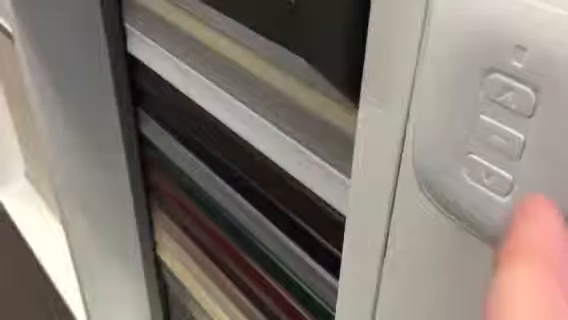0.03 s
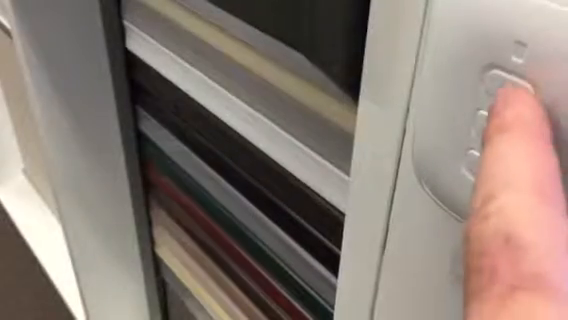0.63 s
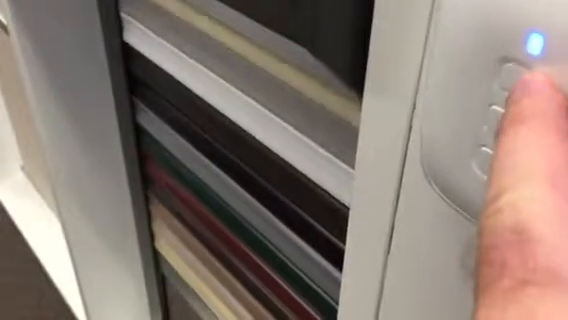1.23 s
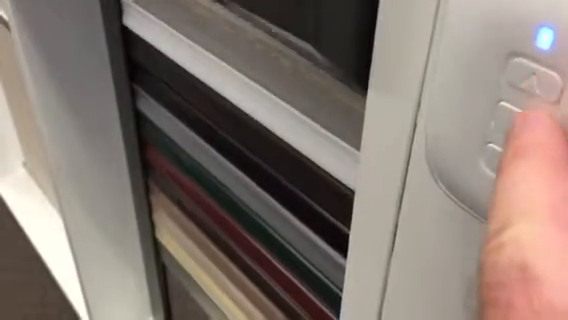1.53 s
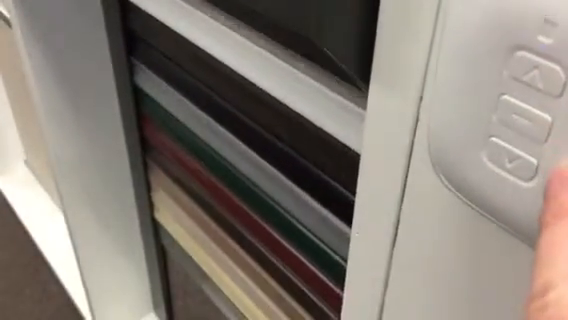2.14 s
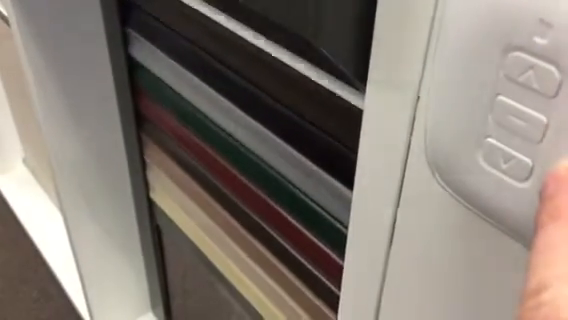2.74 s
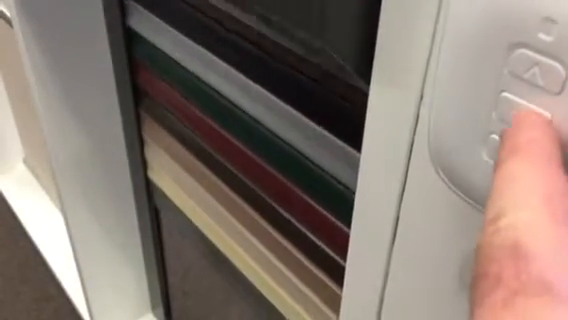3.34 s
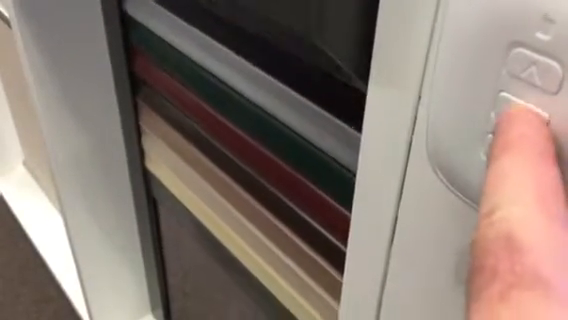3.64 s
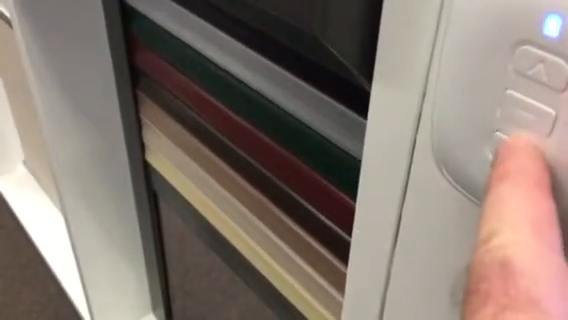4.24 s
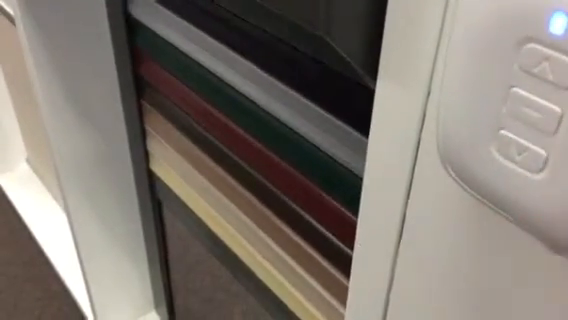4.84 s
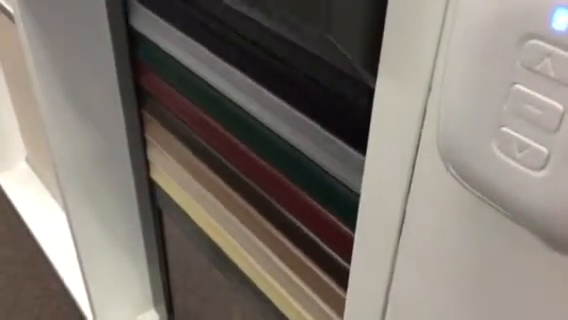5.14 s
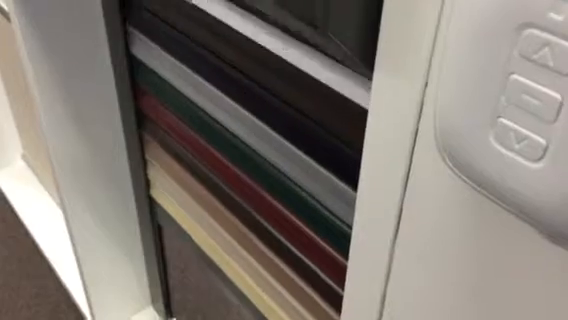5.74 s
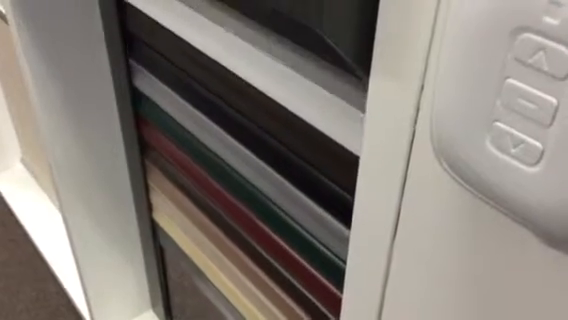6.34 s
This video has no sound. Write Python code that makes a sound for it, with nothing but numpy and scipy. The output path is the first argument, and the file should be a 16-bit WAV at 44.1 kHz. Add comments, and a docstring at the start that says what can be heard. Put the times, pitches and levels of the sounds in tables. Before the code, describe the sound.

A quiet low rumble fills a small room, with the microphone close to a wall switch. Around 0.3 seconds a sleeve brushes faintly with a soft bump of the hand. A button ticks at about 1.2 seconds, then a relay clicks and a roller shutter's motor starts at 1.3. Its whine rises quickly and settles into a steady whir, gears rattling in the housing while the slats hiss softly, scraping lightly near 1.5 and 3.5 seconds. Another button tick comes at 3.8 seconds. At 4 seconds the relay snaps and the motor stops with a tiny squeal and a sharp clunk, the loudest sound, which rings briefly. After a short lull, a button ticks at 4.5 seconds and the motor restarts with a click and a jolt at 4.7. It whines and rattles steadily until the end, at around 6.7 seconds.

```python
"""Roller shutter, up and down

Indoors in a small room, one microphone close to the wall switch. A tubular motor runs, stops and runs
again, its gears whining and rattling in the housing while the slats scrape in their guides. Each button
tick is followed by a relay click and the clunk of the motor's brake. A sleeve brushes as the hand
reaches out, and the room rumbles quietly behind it all."""
import sys
import numpy as np
from scipy import signal
from scipy.fft import rfft, irfft, next_fast_len
from scipy.io import wavfile
from scipy.ndimage import map_coordinates

SR = 44100
rng = np.random.default_rng(int(sys.argv[2]) if len(sys.argv) > 2 else 0)


def int16_out(signal):
    """Quantize to a 16-bit WAV file."""
    q = np.round(np.clip(np.atleast_2d(signal).T, -1, 1) * 32767)
    wavfile.write(sys.argv[1], SR, q.astype(np.int16))


N = 290619
TIME = np.arange(N) / SR

# run 0 goes up, run 1 down: (power on [s], power off [s])
MOTOR_RUNS = [(1.297, 4.012), (4.696, 6.8)]
# per run: (settled speed [turns/s], shortfall at the start [turns/s], settling [s], creep [turns/s^2])
SHAFT_SPEEDS = [(44.45, 5.5, .125, .34), (45.05, 10.5, .065, .28)]
def motor(run, rise_s=0.0059, coast_s=0.022):
    """One run: the shaft starts slow, settles and creeps faster; the sound dies as the power is cut."""
    on, off = MOTOR_RUNS[run]
    settled, shortfall, settling_s, creep = SHAFT_SPEEDS[run]
    age = np.maximum(TIME - on, 0)
    speed = settled - shortfall * np.exp(-age / settling_s) + creep * age
    turns = np.cumsum(speed + 0.0502 * wobble(7)) / SR
    powered = (1 - np.exp(-age / rise_s)) * np.exp(-np.maximum(TIME - off, 0) / coast_s)
    return powered * (rattle(turns, run) + slats(run) + wall(run) + gears(turns, age, run) + mains())


def height():
    """The shutter winds up from 0 to 1, then down at the same pace."""
    up, down = [np.clip(TIME, on, off) - on for on, off in MOTOR_RUNS]
    return (up - down) / up[-1]


# two strong whines: (order [per turn], level up [dB], growth up [dB/s], level down [dB], growth [dB/s])
LOW_WHINES = [(20.03, -43.5, 2.5, -49, 1), (24, -49.5, 3, -54, -1)]
# the third and highest: (order up [per turn], order down [per turn])
TOP_WHINE_ORDER = [29.76, 30]
# its contour, one list per run: (time [s], level [dB])
TOP_WHINE_LEVELS = [
    [(1.33, -48), (1.42, -35.5), (1.72, -42.5), (1.95, -54), (2.6, -50), (3.55, -47.5), (3.76, -36),
     (4.0, -41)],
    [(4.75, -46), (4.87, -34.3), (5.25, -35.5), (6.2, -45.0), (6.55, -42)],
]
# weaker shaft tones: (order [per turn], level up [dB], level down [dB])
WEAK_WHINES = [(4, -50.5, -51.7), (9.985, -57, -58.5), (12.09, -68.5, -59.5), (19.63, -62.5, -52),
               (20.5, -76.5, -48.5), (26.9, -58.5, -58), (29.5, -61, -57), (38, -61, -69),
               (42.85, -63, -57), (46.2, -52.5, -65), (50, -56, -66), (50, -64, -60), (53.8, -57, -54)]
def gears(turns, age, run, build_s=0.22):
    """Whines locked to the shaft; the weak ones build up as the gears take the load."""
    mesh = np.array(LOW_WHINES)[:, [0, 1 + 2 * run, 2 + 2 * run]]
    low = sum(amp(db + growth * age) * whine(turns, order, flutter_db=2, slack_rad=.23)
              for order, db, growth in mesh)
    top_db = np.interp(TIME, *np.transpose(TOP_WHINE_LEVELS[run]))
    top = amp(top_db) * whine(turns, TOP_WHINE_ORDER[run], flutter_db=1.5, slack_rad=.17)
    weak = sum(amp(db[run]) * whine(turns, order, flutter_db=2.5, slack_rad=.22)
               for order, *db in WEAK_WHINES)
    return low + top + (1 - np.exp(-age / build_s)) * weak


def whine(turns, order, flutter_db, slack_rad):
    """One gear tone; backlash makes its level and phase waver."""
    flutter = unit(amp(flutter_db * wobble(22)))
    return np.sqrt(2) * flutter * np.sin(2 * np.pi * order * turns + slack_rad * wobble(14))


# housing resonances: (frequency [Hz], width [Hz], relative level up [dB], relative level down [dB])
HOUSING_MODES = [(197, 70, -15, -13), (235, 25, -16, -10), (253, 52, -12.5, -18), (351.7, 26, -11, -12),
                 (390, 90, -13.5, -16), (442, 25, -13, -17.5), (537, 36, -10.5, -10.5),
                 (607, 134, -14.5, -15.5), (745, 104, -9.5, -7), (816, 160, -9, -6.5), (917, 65, -7.5, -5),
                 (961, 60, -7.5, -7.5), (1081, 136, -7.5, -9.5), (1159, 36, -5.5, -4.5),
                 (1258, 61, -2, -0.5), (1326, 74, -6, -1.5), (1405, 140, -12, -10), (1512, 150, -9, -6.5),
                 (1649, 157, -8, -7.5), (1860, 180, -12, -16.5), (2018, 59, -12.5, -11),
                 (2123, 124, -11.5, -11), (2310, 200, -18, -14.5), (2432, 98, -12, -11.5),
                 (2610, 250, -10.5, -14), (2844, 61, -11.5, -12), (3090, 280, -16.5, -13.5),
                 (3380, 170, -13.5, -10), (3690, 690, -17, -15), (3679, 69, -9.5, -6.5),
                 (4690, 720, -23.5, -21.5)]
# the housing's five frequency zones: (edge [Hz])
ZONE_EDGES = [0, 1110, 1450, 1800, 3000, 6000]
# each zone swells or dips at one shutter height:
# (level up [dB], level down [dB], swell [dB], height [0-1], width [share of full height])
ZONE_LEVELS = [(-41.5, -40.5, 1, 0.25, 0.48), (-39, -39.5, -3, 0.26, 0.34), (-48, -44.5, 6.5, .3, 0.38),
               (-44, -44, 4, 0.29, 0.31), (-48.5, -47.5, 4, 0.65, 0.46)]
def rattle(turns, run, knocks_per_s=5000, spread_db=2.5, throb=0.14):
    """Loose teeth knock at random, hardest four times a turn, and ring the housing."""
    knocks = (rng.random(N) < knocks_per_s / SR) * rng.choice([-1, 1], N)
    knocks = knocks * amp(spread_db * rng.standard_normal(N))
    knocks *= 1 + throb * np.cos(2 * np.pi * 4 * turns)
    modes = np.array(HOUSING_MODES)[:, [0, 1, 2 + run]]
    out = np.zeros(N)
    for low, high, (*base_db, swell_db, centre, width) in zip(ZONE_EDGES, ZONE_EDGES[1:], ZONE_LEVELS):
        zone = modes[(modes[:, 0] >= low) & (modes[:, 0] < high)]
        db = base_db[run] + swell_db * np.exp(-((height() - centre) / width) ** 2) + .5 * wobble(6)
        delayed = np.roll(knocks, low)  # each zone answers with its own delay
        out += amp(db) * unit(filtered(delayed, lambda hz: resonances(zone, hz)))
    return out


def resonances(modes, hz):
    """The gain of a housing zone: its peaks add in power."""
    return np.sqrt(sum((amp(db) / (1 + (2 * (hz - centre) / width) ** 2)) ** 2
                       for centre, width, db in modes))


# hum of the windings: (frequency [Hz], level [dB])
MAINS_TONES = [(50, -68.5), (200, -62), (350, -68.5), (500, -68.5)]
def mains():
    """The windings hum steadily with the mains."""
    return sum(np.sqrt(2) * amp(db) * np.sin(2 * np.pi * hz * TIME) for hz, db in MAINS_TONES)


# the brake lifts at each start: (time [s], level [dB], t60 [s])
BRAKE_LIFTS = [(1.3235, -17, 0.02), (1.3286, -17, 0.033), (4.7252, -13.5, 0.034)]
# it snaps shut and rebounds: (time [s], level [dB], t60 [s], chatter over push [ratio])
BRAKE_CLUNKS = [(4.0691, -4, 0.015, 0.75), (4.0734, -18.5, 0.05, 2.8), (4.0833, -24.5, 0.075, 0.84)]
# their colours: (frequency [Hz], relative level [dB])
LIFT_COLOUR = [(200, -31), (450, -26), (700, -25), (920, 0), (1150, -11), (1800, -11), (2120, 0),
               (2650, -9.5), (3050, -29), (3650, -14), (5200, -28), (8500, -26.5), (11000, -38),
               (16000, -41)]
CLUNK_COLOUR = [(200, -44.5), (480, -26.5), (780, -27.5), (940, -14.5), (1120, -5.5), (1290, -3),
                (1550, -9.5), (1800, -22), (2050, -8.5), (2550, -15.5), (3000, -25.5), (5000, -36),
                (6300, -27), (7200, -33), (16000, -53)]
# the tube, its frame and the wall's low note ring on: (frequency [Hz], level [dB], t60 [s])
AFTER_RING = [(64.3, -55.5, 1.5), (180, -50.5, .7), (348, -54.5, 0.77), (536, -50.5, 0.48),
              (957, -28.5, 0.17), (1000, -52.5, 0.6), (1114, -56.5, 2.1), (1217, -56, 1.1),
              (1310, -37, .14), (1250, -35, .12)]
def brake():
    """The brake lifts at each start and shuts after the motor's squeal; tube, frame and wall ring on."""
    lift = blows(BRAKE_LIFTS, LIFT_COLOUR, scatter=1, contact_s=.00004)
    shut = sum(blows([blow], CLUNK_COLOUR, scatter, contact_s=.00006) for *blow, scatter in BRAKE_CLUNKS)
    shut_at = BRAKE_CLUNKS[0][0]
    age = np.maximum(TIME - shut_at, 0)
    ring = sum(amp(db - 60 * age / t60) * np.sin(2 * np.pi * hz * age + 0.39 * wobble(40) * (age > 0))
               for hz, db, t60 in AFTER_RING)
    return lift + squeal(shut_at) + shut + ring


def squeal(shut_at, start_s=4.005, hz=2430, rise_s=.011, hold_s=.01, release_s=.005):
    """The slowing motor squeals briefly, then only faintly until the brake shuts."""
    age = TIME - start_s
    burst = amp(-36) * np.exp(-np.maximum(age - rise_s - hold_s, 0) / release_s)
    lingering = amp(-53.5) * (TIME < shut_at)
    level = np.clip(age / rise_s, 0, 1) * (burst + lingering)
    return level * np.sqrt(2) * np.sin(2 * np.pi * hz * TIME + .5 * wobble(200))


# button, relay (in, out, in) and motor jolt: (time [s], level [dB], t60 [s])
BUTTON_TICKS = [(1.16, -35.5, 0.023), (3.8372, -31, .008), (4.5055, -35, 0.025)]
RELAY_SNAPS = [(1.2921, -17, 0.0095), (4.0011, -19, 0.011), (4.6915, -18, 0.013)]
MOTOR_JOLTS = [(1.2972, -25.5, 0.063), (4.6968, -22, 0.027)]
# their colours: (frequency [Hz], relative level [dB]); the relay has one level column per snap
BUTTON_COLOUR = [(200, 9), (500, -7), (950, 2.5), (1350, 5.5), (1800, -6), (2200, -6), (3000, -16.5),
                 (3900, -4.5), (5500, -24.5), (9000, -28.5), (12500, -12), (16000, -27)]
RELAY_COLOURS = [(200, -17.5, -8, -7), (500, -17.5, -4.5, -4), (1000, 5, -2.5, -2.5), (1990, 3, -5, 0),
                 (2700, -9.5, -0.5, -11), (4120, -1, -4.5, 3.5), (6090, 0.5, -6, 1.5),
                 (7950, -14, -8.5, -7), (9640, -1, 5, 3), (10440, 0, -5, -6), (11500, -1, 1, 3),
                 (13100, -0.5, -12, -11.5), (16000, -3, -24.5, -15)]
JOLT_COLOUR = [(200, -28), (600, -17), (1200, -2), (2000, 2), (2700, -0.5), (3700, 4.5), (5000, -14.5),
               (7000, -18), (12000, -43.5)]
def switch():
    """The button ticks close to the microphone, the relay snaps, the motor jolts as it takes current."""
    ticks = blows(BUTTON_TICKS, BUTTON_COLOUR, scatter=2.5, contact_s=.00003)
    snaps = sum(blows([snap], np.array(RELAY_COLOURS)[:, [0, 1 + k]], scatter=5, contact_s=.00002)
                for k, snap in enumerate(RELAY_SNAPS))
    return ticks + snaps + blows(MOTOR_JOLTS, JOLT_COLOUR, scatter=1.8, contact_s=.00004)


# slats sliding in the guides: (frequency [Hz], relative level up [dB], relative level down [dB])
SLIDE_COLOURS = [(300, -1, -5.5), (4900, 5.5, 7), (5350, -0.5, 1), (6550, 3.5, 2), (6950, -0.5, 0.5),
                 (7370, 1.5, 2), (8150, -7, -1.5), (9150, -3.5, -1.5), (10250, -15, -12.5),
                 (11300, -13.5, -11), (13000, -16.5, -14), (15800, -21.5, -18)]
def slats(run, level_db=(-55.5, -51.5), height_loss_db=2.5, echo_t60=.03, echo_db=-6.5):
    """The sliding slats hiss, less as they leave the guides, coloured by short room reflections."""
    sliding = noise(np.array(SLIDE_COLOURS)[:, [0, 1 + run]]) * amp(0.95 * wobble(60))
    t = np.arange(SR // 20) / SR
    reflections = rng.standard_normal(len(t)) * amp(-60 * t / echo_t60)
    echo = signal.fftconvolve(sliding, reflections / np.linalg.norm(reflections))[:N]
    return amp(level_db[run] - height_loss_db * height()) * unit(sliding + amp(echo_db) * echo)


# slat scrapes: (time [s], level [dB], rise [s])
SCRAPE_STROKES = [(1.312, -51, .012), (1.533, -47, 0.011), (2.81, -62, 0.018), (3.48, -51.5, 0.022),
                  (3.545, -48.5, 0.012), (3.605, -53, 0.012), (4.024, -52, 0.0036)]
# their colour: (frequency [Hz], relative level [dB])
SCRAPE_COLOUR = [(3000, -22), (5400, -5), (6200, 6), (6900, -10.5), (7600, -6), (8500, -17), (9400, -8),
                 (10400, -23.5), (12000, -19), (16000, -33.5)]
def scrapes():
    """The slats scrape in their guides, roughened by tiny catches."""
    return rubbing(SCRAPE_STROKES, SCRAPE_COLOUR, grain_db=2.5)


# the wall under the motor: (frequency [Hz], relative level [dB])
WALL_COLOUR = [(25, -39), (38, -16), (48, -19), (56, -16.5), (64, -0.5), (78, -4.5), (105, 1), (135, -12),
               (200, 5), (400, -27.5), (1000, -71)]
# its strength: (level up [dB], level down [dB])
WALL_LEVELS = [-55.5, -65]
def wall(run):
    """The wall rumbles under the running motor."""
    return amp(WALL_LEVELS[run]) * noise(WALL_COLOUR)


# the sleeve: (time [s], level [dB], rise [s])
SLEEVE_STROKES = [(.313, -58.5, 0.031), (.42, -57, 0.028)]
# the hand arriving: (time [s], level [dB], t60 [s])
HAND_BUMP = [(.315, -51, .05)]
# their colours: (frequency [Hz], relative level [dB])
SLEEVE_COLOUR = [(290, -11), (500, -3), (674, -10), (1140, -6), (1750, -9), (4170, -9), (5090, -14),
                 (7060, -15), (15000, -33.5)]
BUMP_COLOUR = [(400, -27), (660, -8), (730, 3), (800, -19), (1500, -37), (8000, -50)]
def hand():
    """Near the microphone a sleeve brushes and the hand arrives with a soft bump."""
    sleeve = rubbing(SLEEVE_STROKES, SLEEVE_COLOUR, grain_db=0)
    return sleeve + blows(HAND_BUMP, BUMP_COLOUR, scatter=.4, contact_s=.0001)


# the small room's reverberation: (frequency [Hz], t60 [s])
ROOM_DECAY = [(200, 0.95), (1200, 0.26), (4000, 0.1), (14000, 0.11)]
def room(x):
    """Reflections reach the microphone 4 ms late; each frequency dies at its own speed."""
    hz, t, spectrum = signal.stft(rng.standard_normal(SR // 2), SR, nperseg=256)
    decay = amp(-60 * t / along(ROOM_DECAY, hz)[:, None])
    tail = signal.istft(spectrum * decay, SR, nperseg=256)[1]
    return signal.fftconvolve(x, np.pad(tail / np.linalg.norm(tail), (SR // 250, 0)))[:N]


# room tone, murmur and hiss: (frequency [Hz], relative level [dB])
MURMUR_COLOUR = [(20, -44), (33, -23.5), (46, 1), (66, 1), (82, -6.5), (106, 4), (140, -7.5), (200, -7.5),
                 (330, -22), (500, -32.5), (1000, -46.5), (3000, -80.5)]
HISS_COLOUR = [(100, -4), (220, 5), (400, -5), (720, -4.5), (1500, -12), (3000, -15), (8000, -24.5),
               (16000, -29.5)]
def room_tone(fall_s=(4.05, 4.45), murmur_db=(-53, -58.8), hiss_db=-66):
    """The room's low murmur sinks once, over a faint steady hiss."""
    murmur = amp(np.interp(TIME, fall_s, murmur_db)) * noise(MURMUR_COLOUR)
    return murmur + amp(hiss_db) * noise(HISS_COLOUR)


def blows(rows, colour, scatter, contact_s):
    """Each blow rings a body with one push and a dying chatter of loose parts, scatter times as strong."""
    out, t = np.zeros(N + SR), np.arange(SR // 4) / SR
    push = np.exp(-.5 * (t / contact_s - np.pi) ** 2)
    push /= push.sum()
    for start, db, t60 in rows:
        chatter = rng.standard_normal(len(t)) * amp(-60 * t / t60) * (1 - np.exp(-t / (10 * contact_s)))
        force = scatter * chatter + np.linalg.norm(chatter) * push
        out[round(start * SR):][:len(t)] += amp(db) * force / np.hypot(1, scatter)
    return signal.fftconvolve(out[:N], impulse(colour))[:N]


def rubbing(strokes, colour, grain_db):
    """Friction noise; each stroke's pressure rises quickly and falls more slowly."""
    pressure = np.zeros(N)
    for start, db, rise_s in strokes:
        progress = np.maximum(TIME - start, 0) / rise_s
        pressure += amp(db) * progress * np.exp(1 - progress)
    return pressure * unit(noise(colour) * amp(grain_db * wobble(350)))


def impulse(colour, size=2048):
    """The causal response, of energy 1, of a body with this colour."""
    cepstrum = irfft(np.log(amp(along(colour, np.fft.rfftfreq(size, 1 / SR)))))
    cepstrum[1:size // 2] *= 2
    cepstrum[size // 2 + 1:] = 0
    response = irfft(np.exp(rfft(cepstrum)))
    return response / np.linalg.norm(response)


def noise(colour):
    """Noise of rms 1 with the given colour."""
    return unit(filtered(rng.standard_normal(N), lambda hz: amp(along(colour, hz))))


def filtered(x, response):
    """x shaped by a gain that depends on frequency."""
    size = next_fast_len(N + SR // 2)
    return irfft(rfft(x, size) * response(np.fft.rfftfreq(size, 1 / SR)), size)[:N]


def wobble(rate):
    """A smooth random curve, rate knots a second."""
    return map_coordinates(rng.standard_normal(int(N * rate / SR) + 4), [TIME * rate])


def along(points, hz):
    """(frequency [Hz], value) points read on a log axis."""
    knots_hz, values = np.transpose(points)
    return np.interp(np.log(hz + 1), np.log(knots_hz + 1), values)


def amp(db):
    """Decibels to gain."""
    return 10 ** (np.asarray(db) / 20)


def unit(x):
    """x at rms 1."""
    return x / np.sqrt(np.mean(x ** 2) + 1e-20)


def scene():
    """From beside the switch: the shutter runs up, stops and runs down, with a little room echo."""
    runs = motor(run=0) + motor(run=1)
    hits = switch() + brake()
    echo = room(amp(-13.5) * hits + amp(-18.5) * runs)
    return (runs + hits + echo + hand() + scrapes() + room_tone())[None]


def record(dry, open_s=.117, fade_s=.004, top_hz=16000):
    """The mono microphone opens after a moment and keeps nothing above its band limit."""
    opened = np.clip((TIME - open_s) / fade_s, 0, 1)
    return filtered(dry[0] * opened, lambda hz: hz < top_hz)[None]


dry = scene()
out = record(dry)
int16_out(out)
```